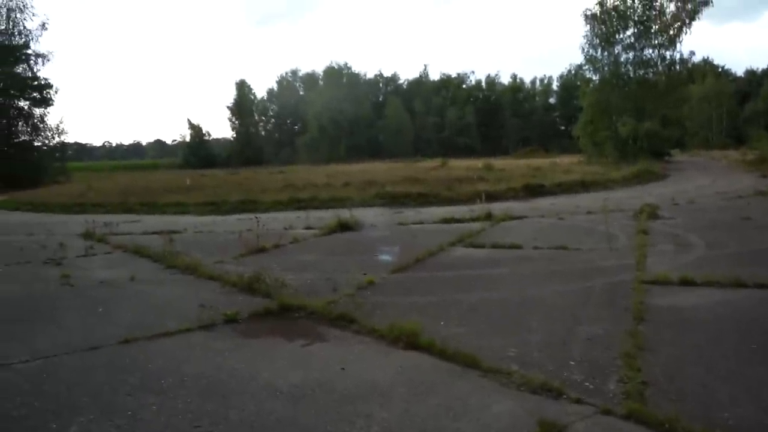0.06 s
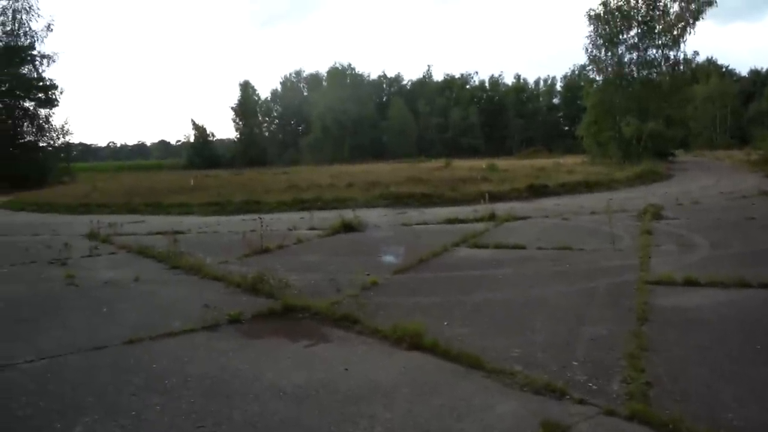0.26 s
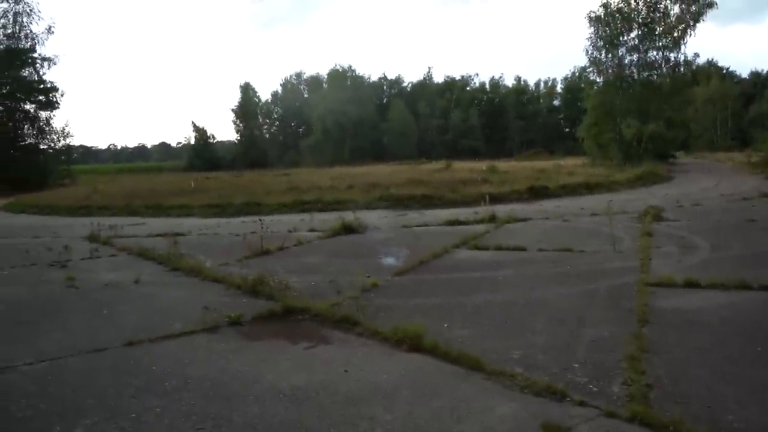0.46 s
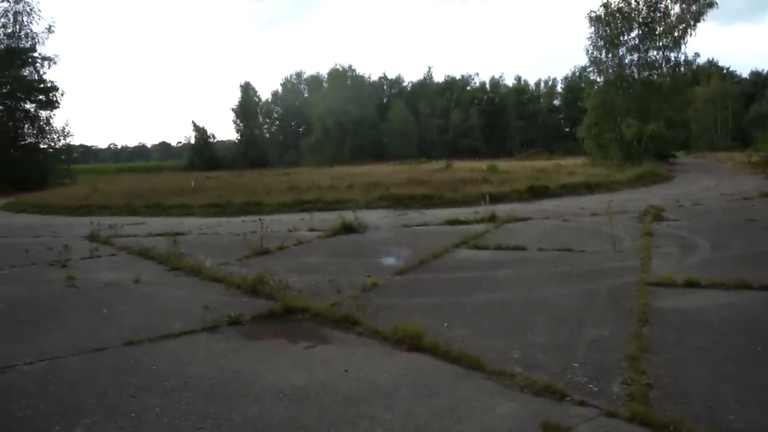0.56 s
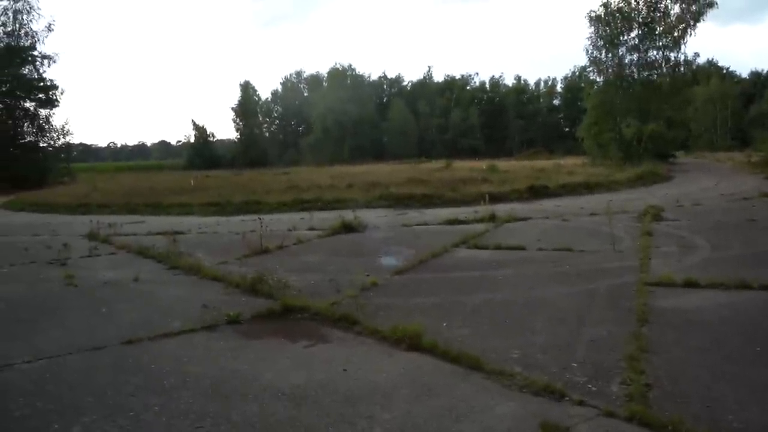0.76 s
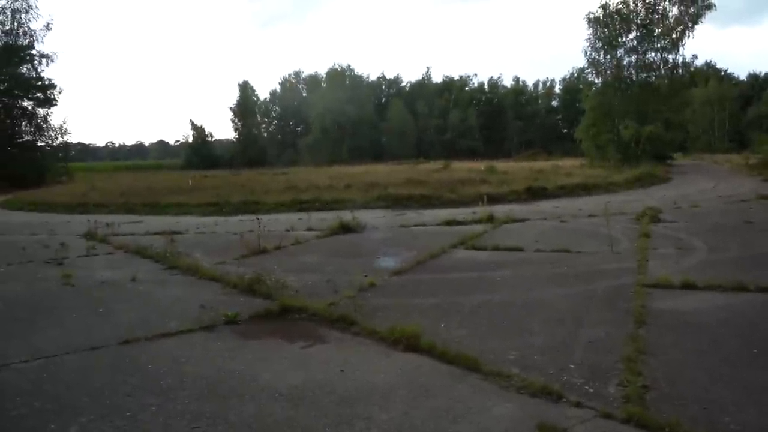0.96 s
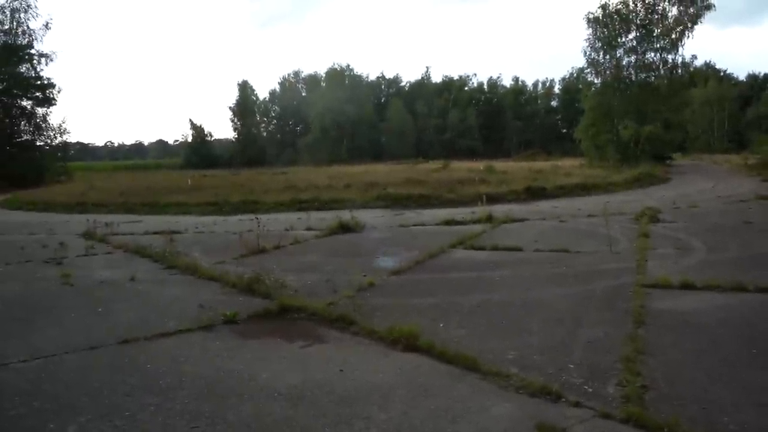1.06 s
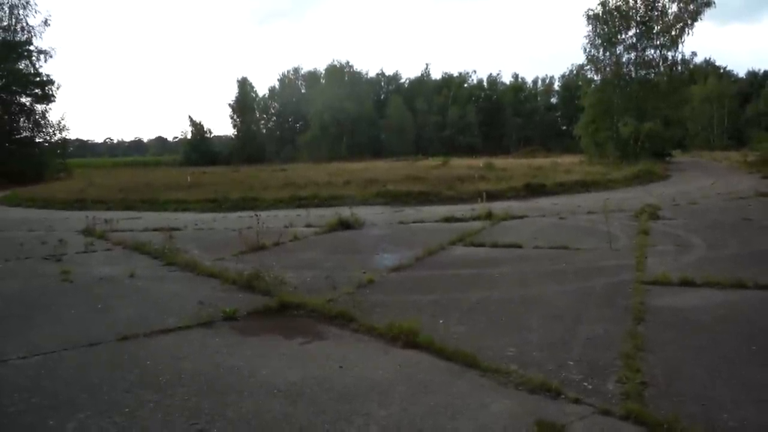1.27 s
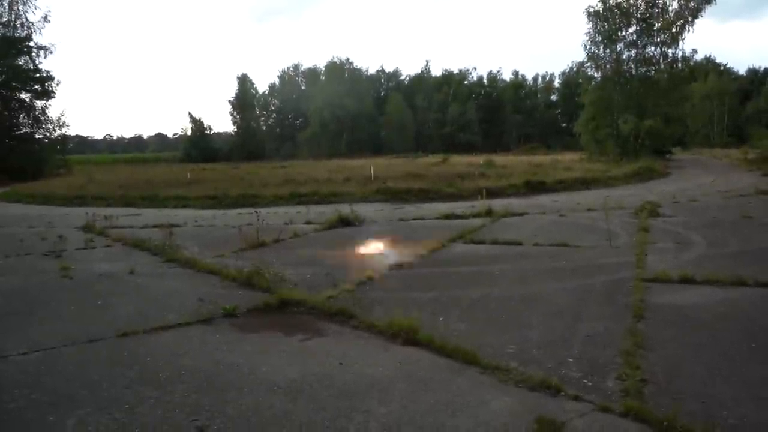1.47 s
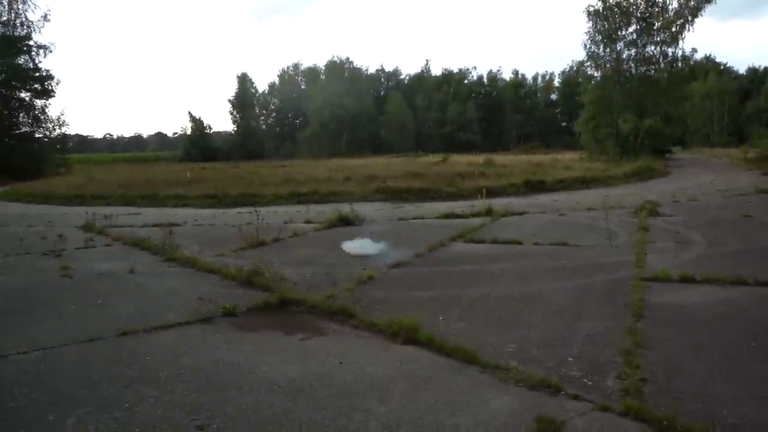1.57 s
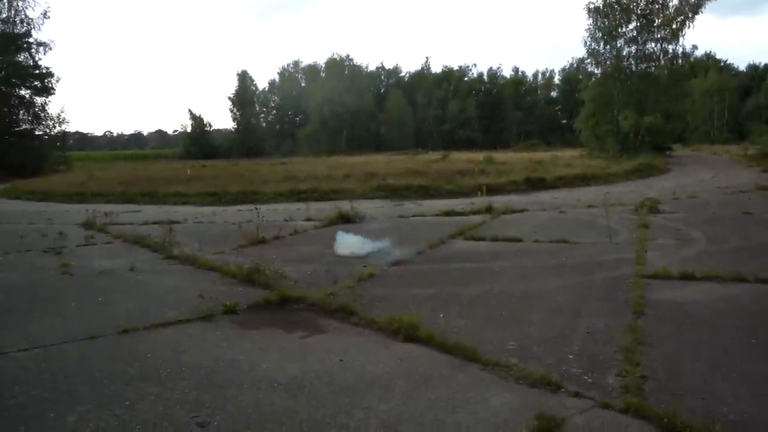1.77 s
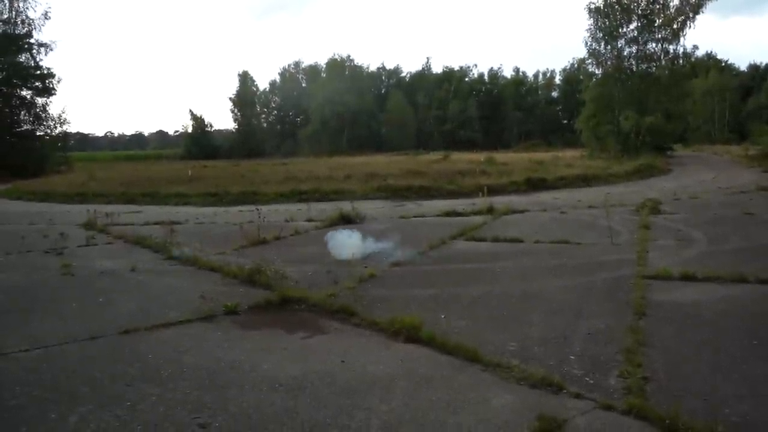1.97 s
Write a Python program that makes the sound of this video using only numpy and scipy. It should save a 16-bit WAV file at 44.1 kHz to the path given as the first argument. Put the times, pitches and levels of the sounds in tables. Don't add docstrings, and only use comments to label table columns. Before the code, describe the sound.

A firecracker on a concrete slab in a clearing: faint fading fuse hiss with tiny crackles over low distant hum and wind, then a sudden overloaded bang and a dense rattling echo off trees, in stereo.

```python
import sys
import numpy as np
from scipy import signal
from scipy.fft import rfft, irfft, next_fast_len
from scipy.io import wavfile
from scipy.ndimage import uniform_filter1d, map_coordinates

SR = 44100
rng = np.random.default_rng(int(sys.argv[2]) if len(sys.argv) > 2 else 0)


def volts_from_decibels(level):
    exponent = np.asarray(level, float) / 20
    return 10 ** exponent


def persist_wave(psi):
    counts = np.round(np.clip(psi, -1, 1) * 32767).astype(np.int16)
    wavfile.write(sys.argv[1], SR, np.atleast_2d(counts).T)


N = 89258

# [t/s, level/dB]
FUSE_BURN = [(0, -45.5), (.02, -55), (.15, -55), (.2, -52), (.23, -56.5), (.36, -61), (.385, -56),
             (.55, -57), (.7, -60), (.93, -61), (1.0, -64), (1.06, -62.5), (1.2, -59.5), (1.345, -62),
             (1.365, -65.5), (1.5, -69.5), (1.515, -63), (1.53, -74.5)]
# [f/Hz, density/dB per Hz]
FIZZ_SPECTRUM = [(1470, -16), (2500, -12.5), (3660, -19.5), (5440, -9.5), (7710, -4.5), (9510, -8),
                 (10900, -20.5), (16000, -18)]
# [f/Hz, correlation/1]
FIZZ_CORRELATION = [(3000, -0.14), (6000, 0.61), (12000, 0.75)]
# [t/s, peak level/dB, f/Hz, left minus right/dB]
SPITS = [(.0043, -32.5, 5500, 1), (.0046, -31, 8200, 1.5), (.0057, -29.5, 5900, 4),
         (.1285, -40, 13500, 5.5), (0.1375, -46, 6100, 3.5), (0.1514, -34.5, 7400, 3),
         (.1517, -40, 12300, 5.5), (0.41, -45, 7400, 9), (.417, -41, 8000, 0), (1.044, -50, 7900, 4),
         (1.062, -46.5, 8050, 9), (1.116, -40, 9930, 2.5), (1.143, -39.5, 9600, 0.5),
         (1.222, -42.5, 7800, 5)]
# [t/s, peak level/dB, f/Hz, left minus right/dB]
POPS = [(.0045, -40, 2300, 0), (.009, -41, 1900, -1), (.011, -42, 1200, 1), (.0122, -38, 1400, 3),
        (.013, -36, 1100, 5), (.0142, -42, 1300, -1), (.0172, -40.5, 1000, 6), (.095, -53, 2600, 3),
        (.128, -50, 2300, 3), (.153, -51, 2600, 3), (.18, -50, 2800, 3), (.3172, -44, 480, 4),
        (.3193, -39, 440, 4), (.3213, -35.5, 560, 5), (.324, -35, 950, 5), (.324, -44, 3000, 2),
        (.3253, -43, 900, 2), (.36, -49, 1300, 3), (.363, -49, 1150, 3), (.4893, -45, 800, 2),
        (.4906, -44, 760, 4), (.492, -47, 800, 4), (.8423, -43, 1700, 13), (.85, -47, 1300, 8),
        (.8612, -44, 1700, 12), (.891, -34.5, 1900, 11), (.8925, -43, 600, 4), (.8945, -47, 2200, 9),
        (.8972, -43, 1900, 11), (.898, -42, 600, 6), (.9003, -45, 1400, 10), (.9018, -41, 1700, 10),
        (.95, -47, 1970, 8), (1.222, -52, 2500, 5), (1.466, -46, 2250, 4)]
# [f/Hz, density/dB per Hz]
HUM_SPECTRUM = [(53, -22), (90, 0.5), (201, -4.5), (353, -10), (544, -6.5), (1070, -4.5), (4170, -36),
                (10800, -28), (16000, -41)]
# [f/Hz, correlation/1]
HUM_CORRELATION = [(150, 0.99), (600, 0.78), (1400, 0.3), (3100, -0.3), (7000, -0.84)]
# [f/Hz, density/dB per Hz]
RUMBLE_SPECTRUM = [(15, -30), (25, 6), (54, -5), (75, -19.5), (130, -20), (170, -43), (290, -120)]
# [t/s, level/dB]
PUFFS = [(.06, -47), (.097, -40.5), (.135, -45), (.22, -43.5), (.279, -52), (.322, -47), (.393, -51),
         (.486, -41), (.564, -42), (0.626, -38.5), (0.649, -44), (0.687, -50), (0.722, -42), (.796, -38.5),
         (.835, -44), (0.88, -48), (.972, -36.5), (1.068, -46), (1.226, -43), (1.261, -35), (1.293, -37),
         (1.327, -34.5), (1.447, -41), (1.478, -38), (1.519, -44), (1.552, -44)]
SHOCK_DB = [
    [-7],
    [-1],
]
SUCTION_DB = [
    [-30],
    [-6],
]
# [t after shock/s, level/dB, f/Hz, sign/1]
CAPSULE_SWINGS = [
    (.001, -8.5, 540, -1),
    (.0017, -12, 650, 1),
    (.0024, -6.5, 750, 1),
    (.003, -6.5, 800, -1),
    (.004, -10, 185, 1),
    (.0108, -24, 260, -1),
]
# [t/s, level/dB]
ECHO_LEVEL = [(1.596, -51), (1.604, -45.5), (1.616, -31.5), (1.66, -32.5), (1.685, -29), (1.8, -26),
              (1.88, -25.5), (2.024, -30)]
# [t/s, trough level/dB, f/Hz, side (left +, saturating beyond 4)/1]
SLAPS = [(1.6071, -14.0, 470.0, 7.0), (1.631, -11.0, 550.0, 1.0), (1.6357, -12.5, 420.0, 4.0),
         (1.6544, -8.5, 480.0, 0.0), (1.6627, -10.0, 470.0, 3.0), (1.681, -9.5, 880.0, -3.0),
         (1.6871, -8.5, 710.0, 4.0), (1.6945, -13.0, 670.0, 6.0), (1.7066, -15.0, 740.0, 4.0),
         (1.7112, -12.0, 820.0, -2.0), (1.7166, -14.0, 820.0, 5.0), (1.7234, -8.5, 880.0, 5.0),
         (1.728, -10.0, 570.0, 10.0), (1.7331, -11.0, 580.0, -1.0), (1.7461, -15.5, 470, 10.0),
         (1.7551, -13.0, 790.0, 6.0), (1.7612, -8.5, 630.0, 4.0), (1.7687, -14.0, 1000.0, -5.0),
         (1.778, -14.0, 820.0, -5.0), (1.7823, -10.5, 610.0, -1.0), (1.7868, -9.5, 880.0, 2.0),
         (1.7995, -12.0, 570.0, 5.0), (1.808, -8.5, 570.0, 6.0), (1.8144, -13.0, 820.0, 2.0),
         (1.8228, -12.0, 470.0, -4.0), (1.8272, -13.5, 880.0, -10.0), (1.8367, -15.0, 1000.0, -4.0),
         (1.8416, -13.5, 650.0, 8.0), (1.8467, -15.0, 920.0, 9.0), (1.8523, -11.0, 440.0, 10.0),
         (1.8604, -8.0, 650.0, 0.0), (1.8697, -12.5, 820.0, 5.0), (1.8737, -9.5, 470, 9.0),
         (1.8792, -12.5, 790.0, 1.0), (1.8834, -10.0, 790.0, 8.0), (1.8994, -5.5, 630.0, 4.0),
         (1.9106, -6.5, 550.0, 4.0), (1.918, -11.0, 460.0, -1.0), (1.9303, -13.5, 630.0, 8.0),
         (1.9354, -13.0, 580.0, 4.0), (1.9395, -13.0, 740.0, 1.0), (1.9453, -14.0, 650.0, 6.0),
         (1.9497, -14.5, 880.0, -10.0), (1.957, -12.0, 550.0, 0.0), (1.9617, -11.5, 850.0, 0.0),
         (1.97, -11.0, 690.0, -1.0), (1.9795, -12.5, 760.0, -2.0), (1.9836, -14.5, 500.0, -4.0),
         (1.9938, -14.5, 500.0, -1.0), (2.0132, -9.0, 740.0, 1.0)]
# [f/Hz, density/dB per Hz]
WASH_SPECTRUM = [(60, -28), (130, -16.5), (300, -13), (600, -7.5), (1300, -9), (3600, -17), (7000, -17),
                 (16000, -35.5)]
# [f/Hz, gain/dB per s of extra path]
AIR = [(100, -15), (200, -22), (400, 12), (2200, -3.5), (5000, -31), (8000, -45), (13000, -68),
       (16000, -110)]
# [f/Hz, correlation/1]
WASH_CORRELATION = [(60, 0.99), (150, 1), (380, 0.78), (950, 0.19), (2380, -0.44), (5980, -0.2),
                    (15000, 0.32)]
# [f/Hz, density/dB per Hz]
NEAR_LEAF_SPECTRUM = [(3000, -33), (5500, 3.5), (9000, 0.5), (15000, -3.5)]

T = np.arange(N) / SR
BANG_S = 1.5935
PORT_LAG_S = .00017
WASH_MID_S = 1.7
SLAP_LEAD = .05
DUCK_DB = -6


def unit(x):
    return x / np.sqrt(np.mean(x ** 2) + 1e-20)


def along(points, hz):
    f, v = np.transpose(points)
    return np.interp(np.log(hz + 1), np.log(f + 1), v)


def curve(rows):
    s, v = np.transpose(rows)
    return np.interp(T, s, v)


def wobble(rate):
    knots = rng.standard_normal(int(N * rate / SR) + 4)
    return map_coordinates(knots, [np.arange(N) * rate / SR])


def rush(spectrum, alike, patchy_db, air=((1, 0), (2, 0))):
    hz, t, z = signal.stft(rng.standard_normal((2, N)), SR, nperseg=1024, noverlap=768)
    patches = rng.standard_normal(z.shape[1:])
    patches = uniform_filter1d(patches, size=9, axis=0)
    patches = uniform_filter1d(patches, size=5, axis=1)
    colour = volts_from_decibels(along([(spectrum[0][0] / 2, -60)] + list(spectrum), hz))
    absorbed_db = np.outer(along(air, hz), np.clip(t - WASH_MID_S, -.05, 1))
    gain = volts_from_decibels(patchy_db * unit(patches) + absorbed_db)
    turn = np.arccos(np.clip(along(alike, hz), -1, 1)) / 2
    z = z * gain * (colour * [np.cos(turn), np.sin(turn)])[..., None]
    noise = signal.istft(z, SR, nperseg=1024, noverlap=768)[1][:, :N]
    mid, side = noise / np.sqrt(np.mean(colour ** 2))
    return np.array([mid + side, mid - side])


def wavelets(s, db, hz, cycles, pan_db, lag_s, noise=0, lead=0):
    out, k = np.zeros((2, N)), np.arange(-400, 400)
    grit = rng.standard_normal((len(s), len(k)))
    for port, sign in enumerate((1, -1)):
        at = (s + sign * lag_s / 2) * SR
        phase = (k - (at % 1)[:, None]) / SR * hz[:, None]
        bell = np.exp(-((phase + lead) / cycles) ** 2)
        w = volts_from_decibels(db + sign * pan_db / 2)[:, None] * bell * (np.cos(2 * np.pi * phase) + noise * grit)
        place = np.clip(at.astype(int)[:, None] + k, 0, N)
        out[port] = np.bincount(place.ravel(), w.ravel(), N + 1)[:N]
    return out


def fuse_fizz():
    level_db = curve(FUSE_BURN) + 1.2 * wobble(60) + [[-.7], [.7]]
    return volts_from_decibels(level_db) * rush(FIZZ_SPECTRUM, FIZZ_CORRELATION, patchy_db=.9)


def fuse_pulses(events, cycles, noise, lead=0):
    s, db, hz, pan = np.transpose(events)
    return wavelets(s, db, hz, cycles, pan, -np.tanh(pan / 5) * PORT_LAG_S, noise, lead)


def fuse():
    fizz = fuse_fizz()
    spits = fuse_pulses(SPITS, cycles=3, noise=.25)
    pops = fuse_pulses(POPS, cycles=.5, noise=.12, lead=-.12)
    return fizz + spits + pops


def traffic_hum():
    return volts_from_decibels(-56.5 + .8 * wobble(8)) * rush(HUM_SPECTRUM, HUM_CORRELATION, patchy_db=1.3)


def wind():
    spectrum = list(RUMBLE_SPECTRUM) + [(260, -49.5)]
    level = volts_from_decibels(-57 + 1.5 * wobble(9))
    rumble = level * unit(rush(spectrum, [(30, 1.0)], patchy_db=0.6))
    puff_s = 0.0066
    puffs = sum(volts_from_decibels(db) * (s - T) / puff_s * np.exp(-((T - s) / puff_s) ** 2) for s, db in PUFFS)
    return rumble + puffs


def shock(u):
    return np.clip(u * 3, 0, 1) * (1 - u / 2) * np.exp(-np.abs(u) / 2)


def capsule_swings(t):
    swings = 0
    for s, db, hz, sign in CAPSULE_SWINGS:
        bell = np.exp(-((t - s) * hz / .38) ** 2)
        swings = swings + sign * volts_from_decibels(db) * bell * np.cos(2 * np.pi * hz * (t - s)) * (t > 0)
    closed_s = .02
    return swings * np.exp(-(t / closed_s) ** 8)


def debris(t):
    return volts_from_decibels(-23) * (t > 0) * np.exp(-(t / .002) ** 2) * rng.standard_normal(t.shape)


def blast():
    t = T - BANG_S - np.array([[.00004], [-.00004]])
    shock_s = np.array([[.00017], [.0001]])
    direct = volts_from_decibels(SHOCK_DB) * shock(t / shock_s)
    bounce = volts_from_decibels(-11) * shock((t - .0012) / shock_s)
    suction = volts_from_decibels(SUCTION_DB) * np.exp(-((t - .0003) / .00006) ** 2)
    return direct - bounce - suction + capsule_swings(t) + debris(t)


def near_leaves():
    u = np.clip(T - 1.602, 0, 1)
    swell = (1 - np.exp(-(u / 0.015) ** 2)) * np.exp(-u / 0.03)
    level_db = -22.5 + 18 * np.array([[.5], [-.5]])
    return volts_from_decibels(level_db) * swell * rush(NEAR_LEAF_SPECTRUM, [(5000, 0.38)], patchy_db=1.5)


def leaf_wash():
    return volts_from_decibels(9.5 + 0.97 * wobble(60.14)) * rush(WASH_SPECTRUM, WASH_CORRELATION, patchy_db=1.1, air=AIR)


def trunk_slaps():
    s, db, hz, pan = np.transpose(SLAPS)
    side = np.tanh(pan / 4)
    return -wavelets(s, db - 1.5, hz, .64, side * 4.5, -side * PORT_LAG_S, lead=SLAP_LEAD)


def small_slaps(count=320):
    from_s, rise_s = 1.63, 0.038
    place = rng.random((count, 2))
    size = np.clip(rng.standard_normal((count, 2)), -1.5, 1.5)
    s = from_s + .39 * place[:, 0]
    side = np.cos(np.pi * place[:, 1])
    hz = 670 * np.exp(.36 * size[:, 1])
    slaps = -wavelets(s, 1.5 * size[:, 0], hz, 0.59, -2.5 * side, side * PORT_LAG_S, lead=SLAP_LEAD)
    slaps = slaps / np.sqrt(np.mean(slaps[:, T > 1.7] ** 2))
    return slaps * np.clip((T - from_s) / rise_s, 0, 1)


def echoes():
    level = volts_from_decibels(curve(ECHO_LEVEL)) * np.clip((T - BANG_S) / .008, 0, 1) ** 2
    slaps = trunk_slaps()
    diffuse = volts_from_decibels(2) * small_slaps() + leaf_wash()
    return slaps + level * diffuse + near_leaves()


def scene():
    after = T > BANG_S
    quiet = fuse() * ~after + traffic_hum() + wind()
    return quiet * volts_from_decibels(DUCK_DB * after) + blast() + echoes()


def roll_off(x):
    return signal.sosfilt(signal.butter(12, 16810, fs=SR, output="sos"), x)


def record(dry):
    ceiling, knee = .72, 5
    soft = dry / (1 + np.abs(dry / ceiling) ** knee) ** (1 / knee)
    m = next_fast_len(N + 4096)
    over = np.clip((np.fft.rfftfreq(m, 1 / SR) - 15550) / 130, 0, 12)
    mix = irfft(rfft(soft, m) * volts_from_decibels(-10 * over), m)[:, :N]
    return roll_off(mix)


dry = scene()
out = record(dry)
persist_wave(out)
```